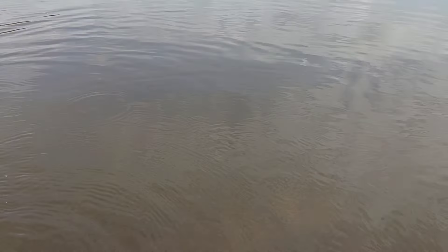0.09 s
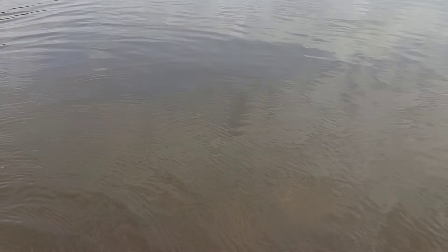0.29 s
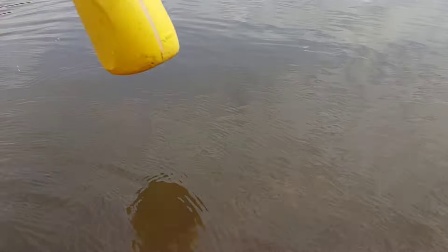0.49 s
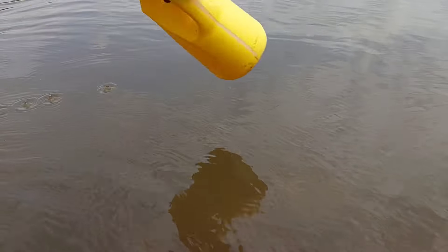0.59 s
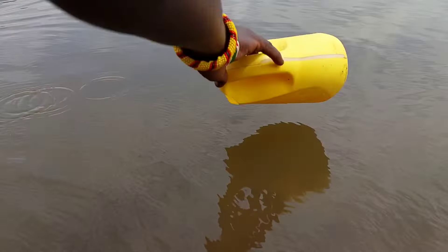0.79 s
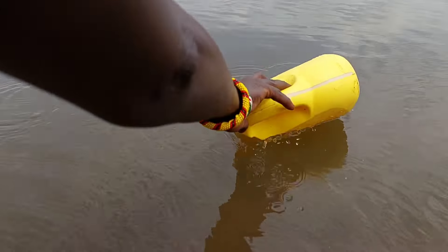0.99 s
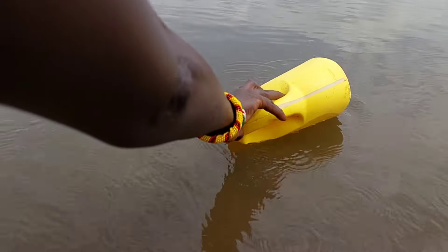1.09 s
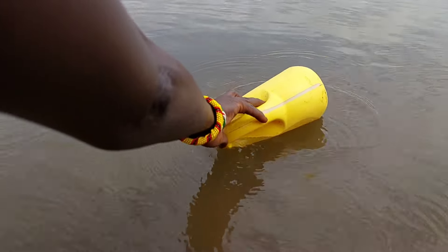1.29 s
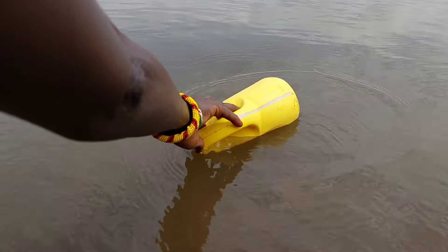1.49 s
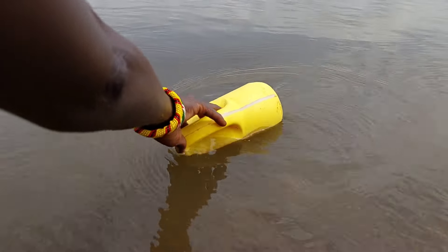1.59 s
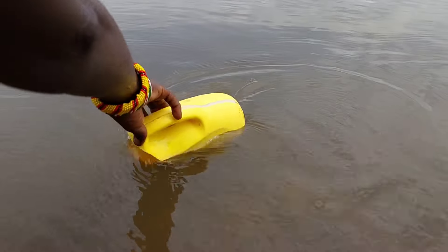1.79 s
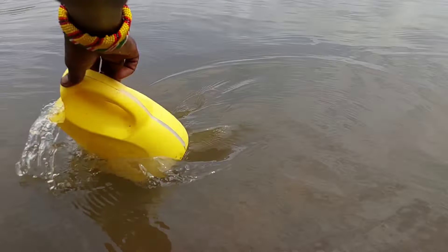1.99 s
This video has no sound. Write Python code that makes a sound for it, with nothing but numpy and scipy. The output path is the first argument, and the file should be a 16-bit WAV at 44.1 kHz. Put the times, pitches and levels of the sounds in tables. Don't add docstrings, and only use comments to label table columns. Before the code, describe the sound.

A strong gust buffets the microphone, far heavier on the right, after small strap rustles and bracelet ticks; a hollow plastic can knocks once, wind stops abruptly, then the can gulps and drips in pond water outdoors.

```python
import sys
import numpy as np
from scipy import signal
from scipy.fft import rfft, irfft, next_fast_len
from scipy.io import wavfile
from scipy.ndimage import uniform_filter1d, map_coordinates

SR = 44100
rng = np.random.default_rng(int(sys.argv[2]) if len(sys.argv) > 2 else 0)


def nominal_scale(level):
    x = np.asarray(level, float) / 20
    return 10 ** x


def log_audio(samples):
    frames = np.atleast_2d(samples).T
    limited = np.clip(frames, -1, 1)
    pcm = np.round(limited * 32767).astype(np.int16)
    wavfile.write(sys.argv[1], SR, pcm)


N = 88200


def unit(x):
    return x / np.sqrt(np.mean(x ** 2, -1, keepdims=True) + 1e-20)


def along(points, hz):
    point_hz, value = np.transpose(points)
    return np.interp(np.log(hz + 1), np.log(point_hz + 1), value)


def curve(rows):
    return np.interp(np.arange(N) / SR, *np.transpose(rows))


def wobble(rate_hz):
    knots = rng.standard_normal(int(N * 900 / SR) + 4)
    return map_coordinates(knots, [np.arange(N) * min(rate_hz, 900) / SR])


def filtered(x, response):
    size = next_fast_len(N + 8192)
    spectrum = rfft(x, size) * response(np.fft.rfftfreq(size, 1 / SR))
    return irfft(spectrum, size)[..., :N]


def noise(points, channels):
    return unit(filtered(rng.standard_normal((channels, N)), lambda f: nominal_scale(along(points, f))))


def bell(f, centre_hz, log_width):
    return np.exp(-.5 * (np.log((f + 1) / centre_hz) / log_width) ** 2)


def place(starts_s, rows):
    first = np.round(np.asarray(starts_s) * SR).astype(int)[:, None]
    at = (first + np.arange(rows.shape[1])).ravel()
    return np.bincount(at, rows.ravel(), N + SR)[:N]


def rubs():
    # start_s, length_s, level_db, centre_hz
    rub_rows = [(0, 0.09, -51.5, 3460), (0.066, 0.068, -59, 4130), (0.362, 0.09, -62.5, 1200),
                (0.888, 0.087, -59.5, 1470), (.892, 0.024, -61, 6400), (1.002, 0.1, -54.5, 1130),
                (1.284, 0.023, -61.5, 510), (0.453, 0.092, -67, 500), (1.5, 0.46, -72.5, 4640),
                (1.23, 0.63, -81, 2520), (1.511, 0.052, -72, 820), (1.777, 0.28, -74, 900),
                (1.942, 0.074, -70, 2320)]
    log_width, grain_db, grain_hz = 0.61, 3.5, 300
    t = np.arange(N) / SR
    out = np.zeros(N)
    for start_s, length_s, level_db, centre_hz in rub_rows:
        band = unit(filtered(rng.standard_normal(N),
                             lambda f: bell(f, centre_hz, log_width) * (centre_hz / (f + 1)) ** .5))
        attack = np.clip((t - start_s) / (0.039 * length_s), 0, 1)
        release = np.clip((start_s + 0.83 * length_s - t) / (0.41 * length_s), 0, 1)
        out += nominal_scale(level_db) * attack * release * unit(band * nominal_scale(grain_db * wobble(grain_hz)))
    return out


def ticks():
    # start_s, peak_db, pitch_hz, t60_s
    tick_rows = [(.016, -35, 4700, 0.0042), (.026, -40.5, 2460, 0.034), (.041, -24.5, 5500, 0.005),
                 (.074, -42.5, 6700, 0.014), (.088, -44.5, 3555, 0.027), (.131, -46, 6330, 0.0062),
                 (.192, -49, 3360, 0.0081), (.284, -46.5, 1910, 0.016), (.285, -46, 3110, 0.0088),
                 (.287, -31, 5150, 0.0092), (.288, -32, 6570, 0.0057), (.329, -55, 11600, 0.022),
                 (.337, -46, 10400, 0.008), (.407, -35, 12800, 0.004), (.429, -46, 3670, 0.034),
                 (.474, -48.5, 5290, 0.016), (.493, -46, 6100, 0.012), (.492, -54.5, 2260, 0.021),
                 (.518, -59, 9900, 0.013), (.535, -55, 10600, 0.01), (0.11, -58, 1343, 0.049),
                 (1.456, -62, 6060, 0.027), (1.585, -60, 9500, 0.021), (1.65, -53, 6380, 0.024),
                 (1.649, -50, 5450, .015), (1.456, -58, 2280, 0.016), (1.549, -62, 6630, 0.055),
                 (1.598, -55.5, 6030, 0.012), (1.843, -66.5, 7400, .01), (1.858, -62, 6300, 0.016),
                 (1.895, -62.5, 6240, 0.019), (1.984, -60, 5840, 0.011), (1.875, -64.5, 9600, 0.023),
                 (1.927, -46, 5400, 0.0038), (1.947, -56, 6800, 0.0081), (1.972, -46, 5000, 0.0036)]
    phase_noise, apart = .27, .9
    crack_db, crack_t60_s, rise_s = -11, .005, .0012
    start_s, peak_db, pitch_hz, t60_s = np.transpose(tick_rows)[:, :, None]
    t = np.arange(2600) / SR
    draw = rng.standard_normal((4, len(start_s), len(t)))
    steps = draw[0] + apart * draw[2:]
    drift = np.cumsum(steps, 2) * phase_noise * np.sqrt(pitch_hz / 20000)
    ring = nominal_scale(-60 * t / t60_s) * np.sin(2 * np.pi * pitch_hz * t + drift)
    crack = nominal_scale(crack_db - 60 * t / crack_t60_s) * np.diff(draw[1], prepend=0) * .5
    envelope = nominal_scale(peak_db + 4.5) * (1 - np.exp(-t / rise_s))
    return np.array([place(start_s[:, 0], envelope * (side + crack)) for side in ring])


def knock():
    # mode_hz, level_db, t60_s
    modes = [
        (377, 2, .036),
        (1351, -29, .022),
        (1529, -25, .022),
        (2536, -38, .022),
    ]
    start_s, level_db = .6553, 7.5
    swell, crack_db, crack_t60_s = 0.12, -41.5, .025
    t = np.arange(SR // 8) / SR
    ring = np.zeros(len(t))
    for mode_hz, mode_db, t60_s in modes:
        rise = 1 - np.exp(-t * mode_hz / 380 / swell)
        ring += nominal_scale(mode_db - 60 * t / t60_s) * rise * np.sin(2 * np.pi * mode_hz * t)
    grit = uniform_filter1d(rng.standard_normal(len(t)), size=3)
    crack = nominal_scale(crack_db - 60 * t / crack_t60_s) * (1 - np.exp(-t / .001)) * grit
    return place([start_s], nominal_scale(level_db) * (ring + crack)[None])


def bubbles(count=260):
    # start_s, peak_db, pitch_hz, t60_s
    gulps = [(1.388, -64, 1243, 0.055), (1.369, -70, 11220, 0.059), (1.728, -42.5, 4340, 0.032),
             (1.73, -50.5, 6330, 0.028), (1.57, -64, 2150, 0.045), (1.617, -65, 2204, 0.041),
             (1.584, -57.5, 3030, 0.013), (1.647, -60, 2930, 0.027), (1.705, -58, 2670, 0.032),
             (1.695, -48, 1285, 0.025), (1.746, -54, 2110, 0.024), (1.764, -55, 890, 0.018),
             (1.83, -59, 1780, 0.022), (1.862, -62.5, 1300, 0.027), (1.9, -61.5, 1914, 0.037),
             (1.73, -48, 690, 0.035), (1.517, -53, 229, 0.12), (1.55, -51.5, 399, 0.086),
             (1.584, -51.5, 326.7, 0.14), (1.587, -56.5, 1240, 0.063), (1.646, -56, 244, 0.13),
             (1.672, -51.5, 2200, 0.057), (1.685, -53, 1189, 0.15), (1.693, -44.5, 338, 0.056),
             (1.712, -31.5, 390, 0.021), (1.711, -47.5, 1266, 0.044), (1.726, -28.5, 370, 0.035),
             (1.73, -33, 1307, 0.023), (1.733, -37.5, 1865, 0.018), (1.752, -39.5, 420.5, 0.076),
             (1.752, -54, 1257, 0.1), (1.768, -57.5, 3710, 0.036), (1.778, -57.5, 1325, 0.082),
             (1.857, -54, 523, 0.041), (1.954, -55.5, 2420, 0.045), (1.962, -60, 2700, 0.019),
             (1.972, -39, 1490, 0.019), (1.988, -56.5, 1091, 0.16), (1.996, -50.5, 830, 0.035)]
    # tone_hz, level_db
    hollow = [(340, -66), (1270, -70), (2200, -70), (3300, -73), (6200, -73)]
    # time_s, level_db
    slosh = [
        (1.44, 2),
        (1.55, -2.5),
        (1.73, 13),
        (1.8, 4),
        (1.9, -12),
        (2, -15),
    ]
    spread, cycles, scatter_db = .075, 12, 2.5
    draw, when = rng.standard_normal((count, 3)), rng.random((count, 1))
    place_in_slosh = (np.arange(count)[:, None] + 5 * when) / (count + 5)
    start_s = slosh[0][0] + place_in_slosh * (slosh[-1][0] - slosh[0][0])
    tone_hz, tone_db = np.array(hollow)[np.arange(count) % len(hollow)].T[:, :, None]
    pitch_hz = tone_hz * np.exp(spread * draw[:, :1] * (1 + 300 / tone_hz))
    peak_db = tone_db + np.interp(start_s, *np.transpose(slosh)) + scatter_db * draw[:, 1:2]
    t60_s = cycles * np.exp(0.51 * draw[:, 2:]) / np.sqrt(pitch_hz * 400)
    singles = ringing(*np.transpose(gulps)[:, :, None])
    return singles + ringing(start_s, peak_db, pitch_hz, t60_s)


def ringing(start_s, peak_db, pitch_hz, t60_s):
    pitch_rise, onset_cycles = .04, 2.2
    break_db, break_hz = 3.2, 160
    t = np.arange(SR // 8) / SR
    phase = 2 * np.pi * pitch_hz * t * (1 + pitch_rise * t / t60_s)
    onset = 1 - np.exp(-t * pitch_hz / onset_cycles)
    rings = nominal_scale(peak_db + 5.5 - 60 * t / t60_s) * onset * np.sin(phase)
    return place(start_s[:, 0], rings) * nominal_scale(break_db * wobble(break_hz))


def near_sounds():
    # freq_hz, level_db
    side_db = [(300, 9.5), (1300, -0.5), (3500, 8.5), (10000, 13)]
    water_right_db = 3.5
    lag_s, echo_db, echo_t60_s = .0001, -2.5, 0.024
    water = nominal_scale(water_right_db * np.c_[[-.5, .5]]) * bubbles()
    near = rubs() + ticks() + knock() + water
    t = np.arange(SR // 10) / SR
    tail = rng.standard_normal((2, len(t))) * nominal_scale(-60 * t / echo_t60_s)
    wet = signal.fftconvolve(near, tail / np.linalg.norm(tail[0]), axes=1)[:, :N]
    side = np.c_[[.5, -.5]]
    return filtered(near + nominal_scale(echo_db) * wet,
                    lambda f: nominal_scale(side * along(side_db, f)) * np.exp(2j * np.pi * f * lag_s * side))


def wind():
    # time_s, strength_db
    gust_left = [(0, -53), (.26, -39.5), (.52, -41.5), (.66, -31), (.73, -40.5), (.82, -25), (1.14, -40),
                 (1.21, -38), (1.27, -54.5), (1.6, -61.5)]
    gust_right = [(0, -50), (.16, -38), (.21, -27), (.31, -17.5), (.43, -29.5), (.53, -29.5), (.74, -29.5),
                  (.84, -13), (.94, -19), (.975, -14.5), (1.06, -7.5), (1.1, -15.5), (1.18, -13),
                  (1.2, -74)]
    # centre_s, peak_db, pitch_hz
    thumps_left = [(.665, -34.5, 59), (0.815, -27, 70), (0.973, -23, 64), (1.119, -24.5, 71),
                   (0.89, -23, 135), (1.006, -42, 135), (1.115, -24, 142), (1.154, -28, 151)]
    thumps_right = [(.215, -23, 75.6), (.773, -29.5, 294), (.34, -23.5, 68.4), (0.428, -18.5, 56),
                    (0.588, -20, 61), (0.758, -25, 71), (0.825, -20, 54.3), (.853, -9.5, 59),
                    (.909, -16.5, 56.4), (0.982, -14.5, 68.4), (1.015, -16, 71.5), (1.067, -8, 59.6),
                    (1.126, -13, 66), (1.161, -15.5, 76), (0.214, -29.5, 127), (0.268, -20.5, 125),
                    (0.308, -14.5, 131), (.413, -22.5, 140), (.577, -28.5, 163), (.777, -23.5, 138),
                    (0.806, -21, 150), (0.829, -29, 164), (0.888, -18, 134), (0.922, -20, 142),
                    (.965, -11, 164), (1.007, -22, 143), (1.038, -6, 140), (1.082, -22.5, 146),
                    (1.118, -22.5, 163.5), (1.144, -12, 152), (1.159, -10, 171), (1.178, -13, 151),
                    (.829, -15, 268), (.977, -15.5, 264), (1.026, -22.5, 240), (1.043, -9.5, 243),
                    (1.059, -4.5, 286), (1.125, -20.5, 300), (1.174, -18, 240), (1.041, -28, 563),
                    (1.065, -16, 465), (1.131, -25, 472)]
    # left_db, right_db
    full_db = (-15, -12)
    # time_s, level_db
    hiss_db = [(.2, -67.5), (.3, -64), (.75, -67), (.89, -61.5), (1.05, -54), (1.16, -58), (1.245, -62),
               (1.255, -72.5)]
    # freq_hz, density_db
    hiss_colour = [(590, 28.5), (1000, -67), (1670, 13.5), (5370, 21), (8880, 11.5), (13000, 17),
                   (16300, -74)]
    hiss_right_db = -11
    ports = np.array([buffet(gust_left, full_db[0], thumps_left),
                      buffet(gust_right, full_db[1], thumps_right)])
    hiss = nominal_scale(curve(hiss_db) + 0.96 * wobble(24.34)) * noise(hiss_colour, channels=2)
    return ports + hiss * nominal_scale([[0], [hiss_right_db]])


def buffet(gust, full_db, singles):
    # centre_hz, log_width, level_db, growth_db_per_db
    eddies = [
        (52.8, 0.44, -1, 0.5),
        (140, 0.37, -4, 0.77),
        (248.6, 0.32, -8, 2),
        (508, 0.24, -25.5, 2),
    ]
    # freq_hz, level_db
    port = [(15, -14), (45, 0), (450, -3.5), (1000, -8.5)]
    lump_db, lump_hz = 2, 39
    lean, bed_db = .2, -4.5
    strength_db = curve(gust)
    bed = np.zeros(N)
    for centre_hz, log_width, level_db, growth in eddies:
        band = unit(filtered(rng.standard_normal(N), lambda f: bell(f, centre_hz, log_width)))
        bed += nominal_scale(level_db + growth * (strength_db - full_db) + lump_db * wobble(lump_hz)) * band
    bed = bed / np.sqrt(np.abs(uniform_filter1d(bed ** 2, size=1800)) + 1e-9)
    leaning = bed + lean * (bed ** 2 - 1)
    pressure = nominal_scale(strength_db + bed_db) * leaning + thumps(singles)
    return filtered(pressure, lambda f: nominal_scale(along(port, f)))


def thumps(rows):
    half_s, shrink, level_db = 0.0077, 0.68, 0.5
    centre_s, peak_db, pitch_hz = np.transpose(rows)[:, :, None]
    t = np.arange(-2000, 2000) / SR
    phase = .8 * rng.standard_normal((len(centre_s), 1))
    swell = np.exp(-.5 * (t / (half_s * (100 / pitch_hz) ** shrink)) ** 2)
    burst = swell * np.cos(2 * np.pi * pitch_hz * t + phase)
    return place(centre_s[:, 0] + t[0], nominal_scale(peak_db + level_db) * burst)


def open_air():
    # freq_hz, density_db
    air_colour = [(40, -34), (150, 2.5), (400, 0), (900, -12), (2500, -18), (8900, -35), (11600, -19.5),
                  (16300, -26)]
    # left_db, right_db
    air_db = (-55.5, -59.5)
    alike = 0.081
    a, b = noise(air_colour, channels=2)
    pair = unit(np.array([a, alike * a + (1 - alike) * b]))
    return nominal_scale(np.array(air_db)[:, None] + 1.24 * wobble(11.62)) * pair


def far_pump():
    # freq_hz, level_db
    pump_colour = [(40, -5), (130, -3.5), (240, 3), (340, -4.5), (500, -26.5), (2000, -110)]
    # left_db, right_db
    pump_db = (-53, -57)
    rate_hz, jitter_cycles = 43.95, .012
    k = np.arange(int(N / SR * rate_hz))
    draw = rng.standard_normal((len(k), 2))
    starts_s = (k + .57 + jitter_cycles * draw[:, 0]) / rate_hz
    pulses = place(starts_s, nominal_scale(1.5 * draw[:, 1:]))
    return nominal_scale(np.array(pump_db)[:, None]) * unit(filtered(pulses, lambda f: nominal_scale(along(pump_colour, f))))


def background():
    # time_s, gain_db
    gain_db = [(0, 4.5), (.2, -10.5), (1.2, -3), (1.27, -14), (2, -12.5)]
    return nominal_scale(curve(gain_db)) * (open_air() + far_pump())


def scene():
    return near_sounds() + wind() + background()


def low_pass(x):
    return signal.sosfilt(signal.butter(12, 16440, fs=SR, output="sos"), x)


def record(dry):
    mix = filtered(dry, lambda f: f < 16350)
    return low_pass(mix)


dry = scene()
out = record(dry)
log_audio(out)
```